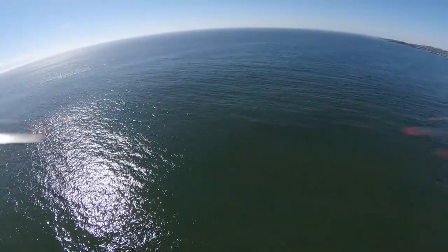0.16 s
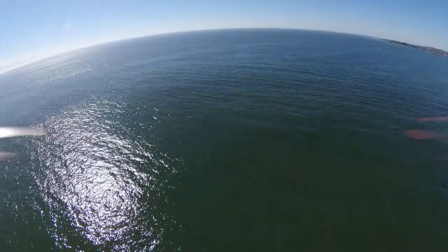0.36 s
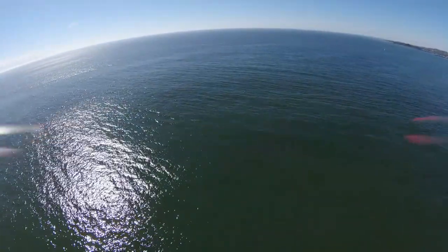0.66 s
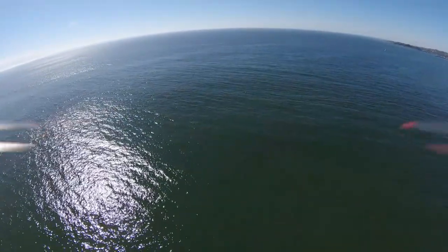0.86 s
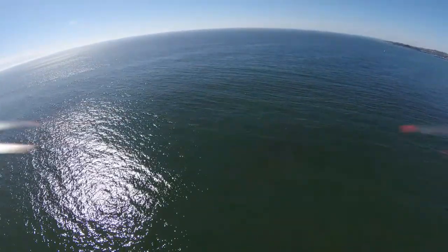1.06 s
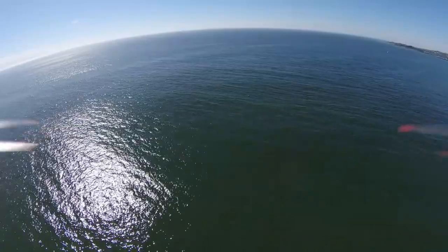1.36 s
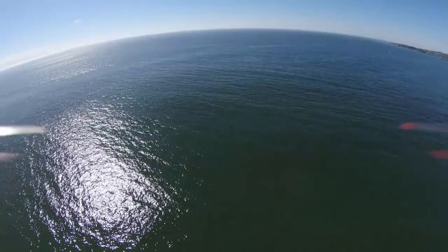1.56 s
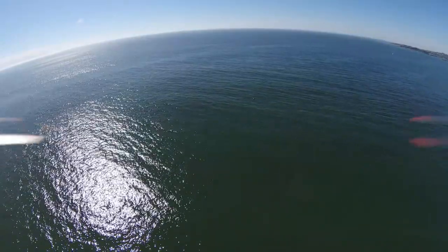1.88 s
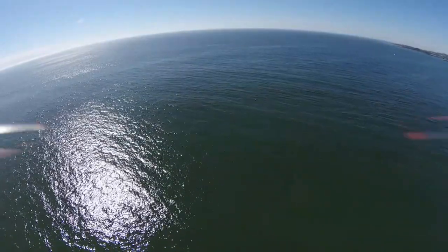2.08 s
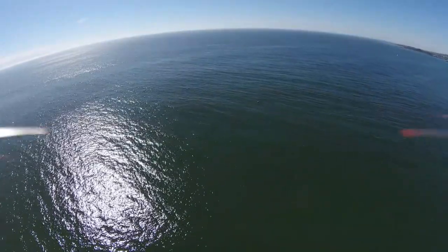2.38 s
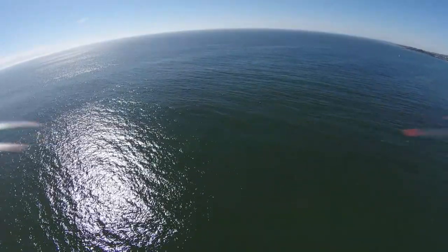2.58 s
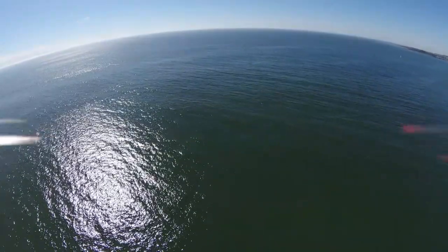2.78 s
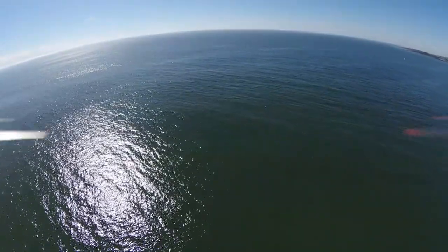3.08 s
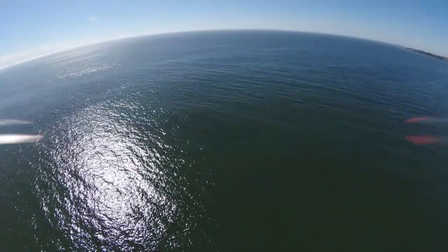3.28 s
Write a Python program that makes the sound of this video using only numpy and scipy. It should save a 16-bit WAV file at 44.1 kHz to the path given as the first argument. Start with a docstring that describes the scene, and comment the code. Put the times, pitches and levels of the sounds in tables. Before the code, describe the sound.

Loud drone motor buzz heard from on board: pitch drops, holds with beating, then climbs sharply.

```python
"""A four-rotor drone over a sea that makes no sound here, heard from its own camera.
First it eases off and its hum sinks, then it roughly holds its speed, and at the end it throttles up.
All through, each three-bladed propeller hums at its own pitch, so the four beat against each other.
Each motor buzzes on multiples of its shaft rate, shaking the frame, and one bearing sings in between.
Noise for the rotor wash rushes underneath, chopped by the blades; the camera is dull above 3.3 kHz."""
import sys
import numpy as np
from scipy.fft import rfft, irfft, next_fast_len
from scipy.io import wavfile
from scipy.ndimage import uniform_filter1d, map_coordinates

SR = 44100
rng = np.random.default_rng(int(sys.argv[2]) if len(sys.argv) > 2 else 0)


def log_audio(samples):
    """Write samples as a 16-bit WAV file to the path given in sys.argv[1]."""
    # one column per channel
    frames = np.atleast_2d(samples).T
    # limit to full scale, then quantise
    limited = np.clip(frames, -1, 1)
    pcm = np.round(limited * 32767).astype(np.int16)
    wavfile.write(sys.argv[1], SR, pcm)


N = 151704  # length in samples

# Flight of each rotor: (time [s], blades passing per second [Hz], push of the blades on the air [dB])
FLIGHT_A = [(0.0, 699.5, 2), (0.05, 699.0, 2.7), (0.12, 674.5, 0.5), (0.25, 665.0, 2.6), (0.41, 656.5, 1.5),
            (0.5, 618.5, -0.2), (0.6, 590.0, -1.4), (0.72, 579.0, -2), (1.08, 570.0, -1.9),
            (1.5, 581.0, -0.5), (2.15, 587.5, 0.3), (2.7, 593.5, 0.5), (2.79, 671.5, 3.5),
            (2.91, 711.0, 4.5), (3.16, 725.5, 4.5), (3.26, 776.5, 7.5), (3.37, 775.5, 6.5),
            (3.44, 739.5, 5)]
FLIGHT_B = [(0.0, 656.5, 9), (0.06, 653.5, 7.5), (0.122, 627.0, -7), (0.41, 625.0, 1.5),
            (0.498, 592.5, 4.5), (0.602, 569.0, 5), (0.898, 562.5, 2), (1.498, 563.0, 2), (2.099, 560.0, 1),
            (2.7, 555.0, 0.5), (2.8, 640.0, 2.4), (2.908, 678.5, 5), (3.172, 700.5, 6), (3.272, 750.5, 7.5),
            (3.38, 757.0, 12.5), (3.44, 741.0, 3)]
FLIGHT_C = [(0.0, 657.5, 1), (0.05, 650.5, 4), (0.15, 626.5, 2.5), (0.41, 602.0, 1.5), (0.5, 564.0, 0),
            (0.6, 537.0, -2), (0.72, 513.5, 0.3), (0.871, 517.0, -3), (1.068, 495.0, -1.5),
            (1.402, 490.5, -0.8), (1.901, 486.5, -1.4), (2.7, 485.0, -0.8), (2.79, 551.0, 2.2),
            (2.919, 582.0, 1), (3.17, 601.5, 4.5), (3.268, 645.0, 2), (3.372, 642.0, 4),
            (3.44, 596.0, -2.5)]
FLIGHT_D = [(0.0, 581.5, 12), (0.05, 582.0, 8), (0.18, 555.5, 4.5), (0.392, 560.5, 7), (0.498, 528.0, 4.5),
            (0.601, 508.0, 3.5), (0.752, 518.0, 7), (1.05, 498.0, 8), (1.451, 480.0, 1.5),
            (2.1, 469.0, 2.2), (2.7, 466.0, 0), (2.799, 530.0, 9.5), (2.922, 578.0, 11.5),
            (3.168, 603.5, 4), (3.282, 658.0, 9), (3.37, 675.0, 10), (3.44, 644.0, 19)]
# Rotors A to D: (blade rate at cruise [Hz], blade left-right difference [dB],
#  motor left-right difference [dB], lead at the left port [ms], whine level at cruise [dB])
ROTORS = [(604, 4.5, -6.5, .02, -53.5), (545, -6, -3, .12, -49.5), (478, -4, -5.5, 0.095, -49.5),
          (474, 0, -5.5, 0.11, -59)]
# Propeller tones: (multiple of the blade rate, base level of rotor A [dB], B [dB], C [dB], D [dB])
BLADE_TONES = [(1, -42, -49.5, -41.5, -61.5), (2, -55.5, -62, -42.5, -55.5), (3, -54.5, -61, -49.5, -51.5),
               (4, -54.5, -51.5, -57, -60), (5, -69.5, -54.5, -59, -69.5), (6, -70, -69, -69.5, -56),
               (7, -72.5, -65.5, -56.5, -72.5)]
# Imbalance and motor tones, before the frame:
# (multiple of the shaft rate, level at cruise of rotor A [dB], B [dB], C [dB], D [dB])
MOTOR_TONES = [(1, -58.5, -61.5, -59.5, -61.1), (2, -67, -68, -64.5, -68), (4, -68.5, -66, -68.5, -64.5),
               (5, -67, -66.5, -67.5, -71.5), (7, -60, -69, -67.5, -68.5), (8, -58.5, -68, -68, -62),
               (10, -64, -66.5, -61, -63), (11, -59.5, -59, -58.5, -65.5), (13, -51.5, -54.5, -51.5, -62.5),
               (14, -54.5, -52.5, -49.5, -65.5), (16, -62.5, -63, -74, -71.5), (19, -68, -59.5, -65, -68),
               (20, -69, -70.5, -66, -68), (22, -68, -72.5, -51.5, -77)]
# Frame resonances: (centre [Hz], width [Hz], boost [dB])
FRAME_RESONANCES = [(256, 46, 5.5), (938, 120, 11), (1460, 260, 5), (2300, 170, 1)]
# How the frame passes or damps the buzz: (frequency [Hz], gain [dB])
FRAME_DAMPING = [(2900, -0.5), (3150, 1), (3550, -1), (3800, -9), (4300, -18.5)]
# Colour of the rotor wash: (frequency [Hz], relative level per Hz [dB])
WASH_COLOUR = [(20, -7.5), (45, 0), (110, 5.5), (200, 4), (400, 1.5), (750, -1), (1050, 2.5), (1400, 5),
               (1900, -2.5), (2800, 1), (3400, -4.5), (4500, -13.5), (5000, -21.5), (5600, -4), (6300, -17),
               (9000, -16), (14000, -29)]
# How alike the wash is left and right: (frequency [Hz], likeness [1 = same, 0 = unrelated])
WASH_ALIKE = [(30, 1), (200, 0.45), (700, 0.28), (1400, 0.63), (2500, 0.055), (5000, 0.13)]
# Balance of the wash: (frequency [Hz], left-right difference [dB])
WASH_PAN = [(50, -0.5), (400, -.5), (900, -1), (1500, -5), (2200, -3.5), (3500, -3.5), (6000, -1.5)]
# Response of the camera: (frequency [Hz], gain [dB])
CAMERA_RESPONSE = [(20, -5), (3100, -1), (3300, -1.5), (3550, -12), (3800, -19), (4100, -28.5), (4300, -50),
                   (5500, -39), (8000, -39.5), (10000, -51.5)]

BLADES = 3  # per propeller
FLUTTER_RATE = 35.14  # random turns per second in the level and phase of every tone
BLADE_FLUTTER_DB, BLADE_JITTER = -0.03, 0.22  # dB on the first tone, rad per multiple
OVERTONE_GROWTH_DB = 12  # second blade tone, dB per doubling of speed
MOTOR_GROWTH_DB = 2  # motor tones and higher blade tones, dB per doubling of speed
MOTOR_FLUTTER_DB, MOTOR_JITTER = 2, 0.42  # dB, rad
WHINE_ORDER, WHINE_JITTER = 42, 1.3  # multiple of the shaft rate, rad
WHINE_GROWTH_DB, WHINE_PAN_DB = -12, -5.5  # dB per doubling of speed (it fades), left-right dB
BEARING_ORDER, BEARING_JITTER = 17.6, 0.38  # multiple of the shaft rate, rad
BEARING_DB, BEARING_PAN_DB = -52.5, -4.5  # level before the frame, left-right dB
WASH_DB, WASH_GROWTH_DB = -39, 3.5  # level at cruise, dB per doubling of speed
WASH_SWELL_DB, CHOP = 0.35, 0.4  # random swell, strength of the chopping
TOP_HZ = 10100  # the camera passes nothing from here up


def amp(db):
    """Turn decibels into a plain multiplier."""
    return 10 ** (np.asarray(db) / 20)


def unit(x):
    """Scale a sound to an average (RMS) strength of 1."""
    return x / np.sqrt(np.mean(x ** 2) + 1e-20)


def along(points, hz):
    """Read a value between (frequency, value) points, spaced by pitch (log axis)."""
    f, v = np.transpose(points)
    return np.interp(np.log(hz + 1), np.log(f + 1), v)


def wobble(rate):
    """Draw a smooth random curve through `rate` random points a second."""
    points = rng.standard_normal(N // 50)
    return map_coordinates(points, [np.arange(N) * rate / SR], mode="wrap")


def filtered(x, response):
    """Multiply each frequency of x by response(frequency)."""
    m = next_fast_len(N + SR // 4)
    spectrum = rfft(x, m) * response(np.fft.rfftfreq(m, 1 / SR))
    return irfft(spectrum, m)[..., :N]


def sides(difference):
    """Give the left channel plus half of a difference and the right channel minus half."""
    return np.array([[.5], [-.5]]) * difference


def spin(points):
    """Give blade rate (Hz), phase (rad) and push (dB) per sample; inertia rounds the speed changes."""
    s, rate, load_db = np.transpose(points)
    t = np.arange(N) / SR
    hz = uniform_filter1d(np.interp(t, s, rate), size=1100, mode="nearest")
    phase = 2 * np.pi * np.cumsum(hz) / SR + rng.uniform(0, 2 * np.pi)
    return hz, phase, np.interp(t, s, load_db)


def tone(phase, level_db, flutter_db, jitter):
    """Make one pure tone that turbulence shakes in level and phase; it dips lowest near phase 0."""
    angle = phase + jitter * wobble(FLUTTER_RATE)
    level = amp(level_db + flutter_db * wobble(FLUTTER_RATE))
    return -np.sqrt(2) * level * np.cos(angle.astype(np.float32))


def wash(spins):
    """Turbulent air is noise, chopped by every passing blade and louder at higher speed."""
    efforts = [np.log2(hz / row[0]) for (hz, _, _), row in zip(spins, ROTORS)]
    effort = np.mean(efforts, axis=0)  # doublings of speed above cruise
    chop = 1 + CHOP * np.mean([np.cos(phase) for _, phase, _ in spins], axis=0) * 2

    def mid_side_colour(hz):
        # A wider angle gives more side and less mid, so left and right are less alike
        angle = np.arccos(np.clip(along(WASH_ALIKE, hz), -1, 1)) / 2
        return amp(along(WASH_COLOUR, hz)) * [np.cos(angle), np.sin(angle)]

    mid, side = filtered(chop * rng.standard_normal((2, N)), mid_side_colour)
    left_right = np.array([mid + side, mid - side])
    air = unit(filtered(left_right, lambda hz: amp(sides(along(WASH_PAN, hz)))))
    return air * amp(WASH_DB + WASH_GROWTH_DB * effort + WASH_SWELL_DB * wobble(12))


def bearing(phase):
    """A ball bearing sings at a rate that is no whole multiple of its shaft's."""
    song = tone(BEARING_ORDER * phase / BLADES, BEARING_DB, MOTOR_FLUTTER_DB, BEARING_JITTER)
    return song * amp(sides(BEARING_PAN_DB))


def frame(buzz):
    """The frame boosts a tone that sweeps through one of its resonances and damps the highest ones."""
    def gain(hz):
        boost_db = sum(db / (1 + (2 * (hz - centre) / width) ** 2)
                       for centre, width, db in FRAME_RESONANCES)
        return amp(boost_db + along(FRAME_DAMPING, hz))

    return filtered(buzz, gain)


def motor_buzz(index, shaft, effort):
    """Imbalance and the motor make tones on whole multiples of the shaft rate, each starting anywhere."""
    buzz = 0
    for k, *levels in MOTOR_TONES:
        angle = round(k) * shaft + rng.uniform(0, 2 * np.pi)
        level_db = levels[index] + MOTOR_GROWTH_DB * effort
        buzz += tone(angle, level_db, MOTOR_FLUTTER_DB, MOTOR_JITTER)
    return buzz


def motor_whine(shaft, level_db, effort):
    """A faint high tone turns with the shaft and fades as the speed rises."""
    whine_db = level_db + WHINE_GROWTH_DB * effort
    return tone(WHINE_ORDER * shaft, whine_db, MOTOR_FLUTTER_DB, WHINE_JITTER)


def propeller(index, ports, load_db, effort):
    """Each passing blade makes one suction dip, built from tones that dip together."""
    blades = 0
    for k, *levels in BLADE_TONES:
        k = round(k)
        if k == 1:
            swell_db = load_db
        elif k == 2:
            swell_db = load_db + OVERTONE_GROWTH_DB * effort
        else:
            swell_db = MOTOR_GROWTH_DB * effort
        flutter_db = BLADE_FLUTTER_DB * np.sqrt(k)
        blades += tone(k * ports, levels[index] + swell_db, flutter_db, BLADE_JITTER * k)
    return blades


def rotor(index, hz, phase, load_db):
    """Blades and whine sound through the air; the motor buzz is kept apart because it shakes the frame."""
    cruise_hz, blade_pan_db, motor_pan_db, lead_ms, whine_db = ROTORS[index]
    effort = np.log2(hz / cruise_hz)  # doublings of speed above cruise
    ports = phase + 2 * np.pi * hz * sides(lead_ms / 1000)  # blade phase at the left and right ports
    shaft = ports / BLADES
    blades = propeller(index, ports, load_db, effort) * amp(sides(blade_pan_db))
    whine = motor_whine(shaft, whine_db, effort) * amp(sides(WHINE_PAN_DB))
    buzz = motor_buzz(index, shaft, effort) * amp(sides(motor_pan_db))
    return blades + whine, buzz


def scene():
    """Add up the wash, the buzz of the frame with the bearing of rotor C, and the four rotors."""
    spins = [spin(points) for points in (FLIGHT_A, FLIGHT_B, FLIGHT_C, FLIGHT_D)]
    airborne, buzz = np.sum([rotor(index, *s) for index, s in enumerate(spins)], axis=0)
    _, phase_c, _ = spins[2]
    return airborne + frame(buzz + bearing(phase_c)) + wash(spins)


def record(dry):
    """The camera rolls off steeply above 3.3 kHz; only a trace of the whine gets through."""
    return filtered(dry, lambda hz: amp(along(CAMERA_RESPONSE, hz)) * (hz < TOP_HZ))


dry = scene()
out = record(dry)
log_audio(out)
```